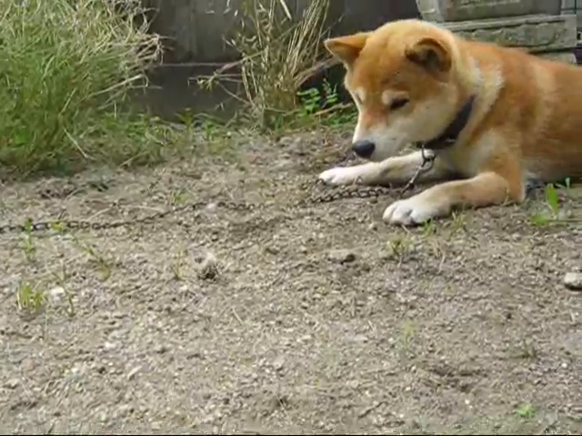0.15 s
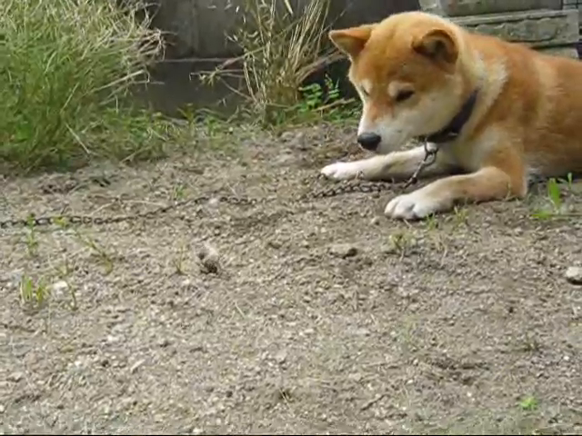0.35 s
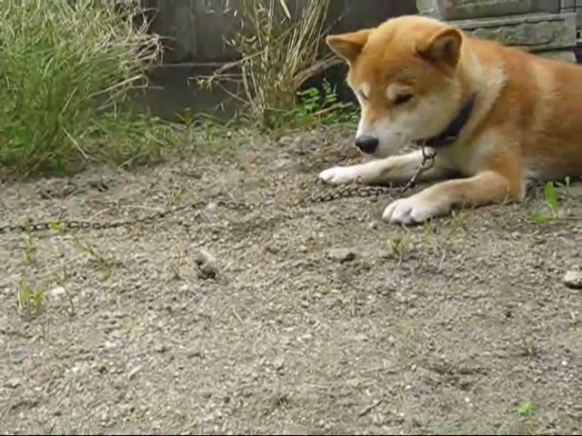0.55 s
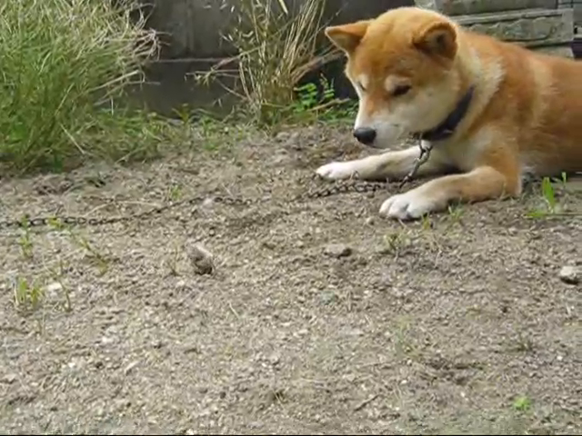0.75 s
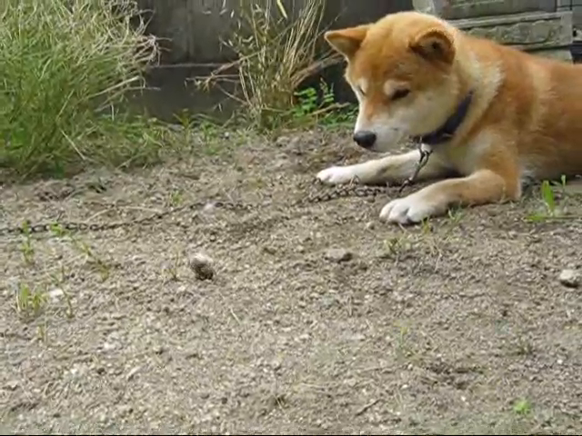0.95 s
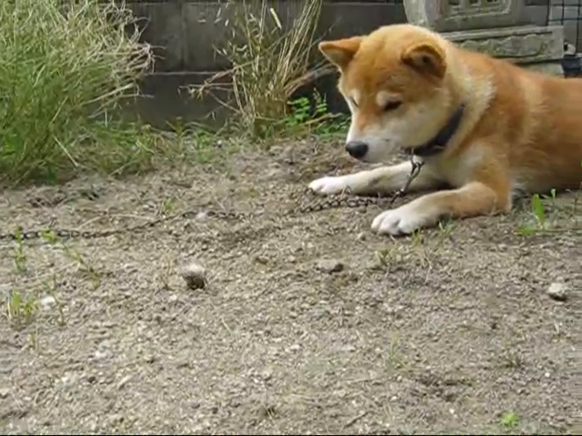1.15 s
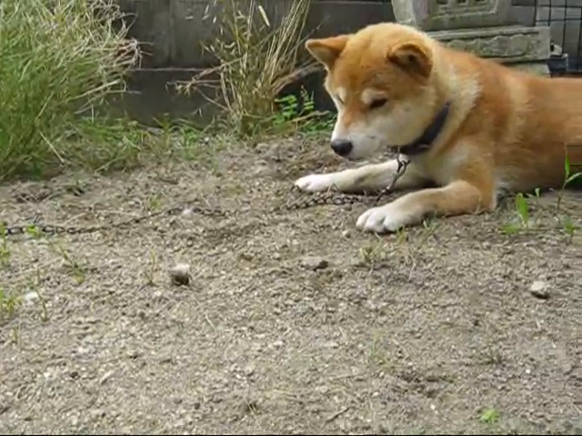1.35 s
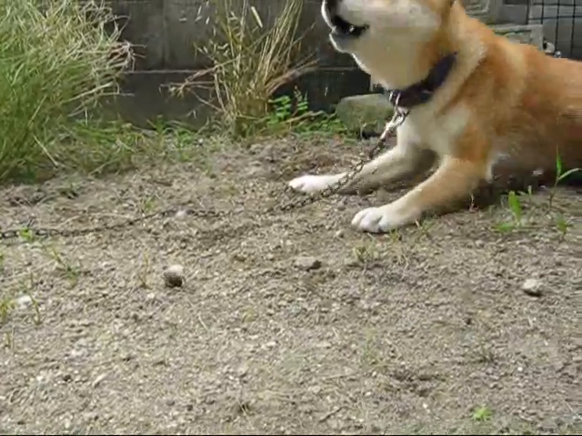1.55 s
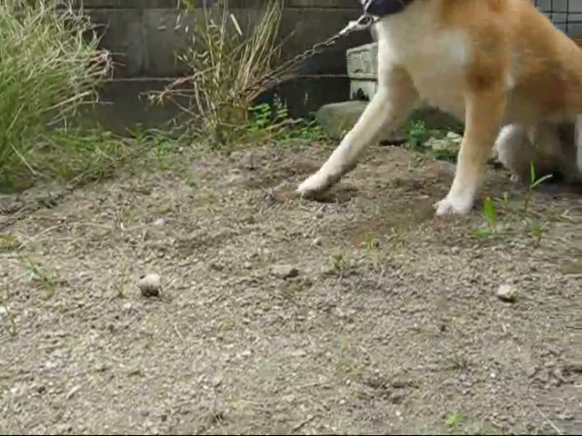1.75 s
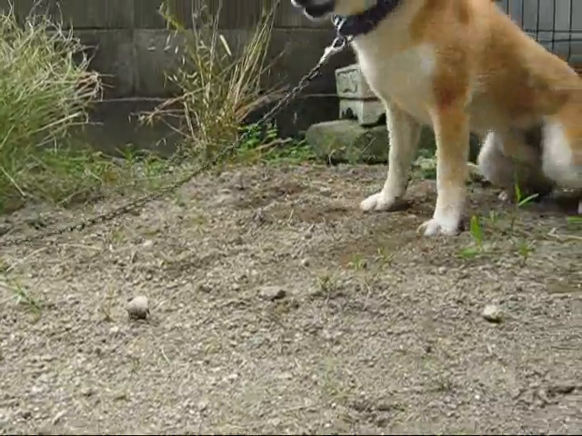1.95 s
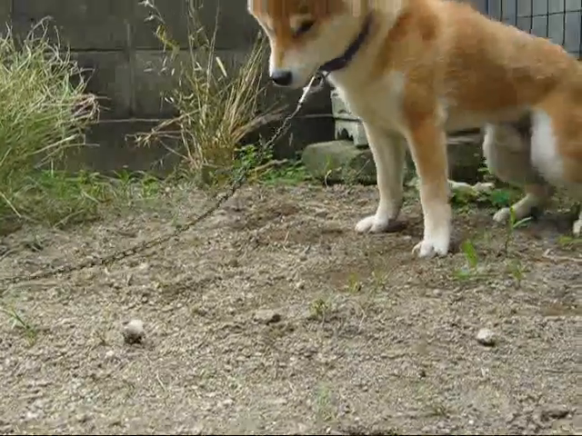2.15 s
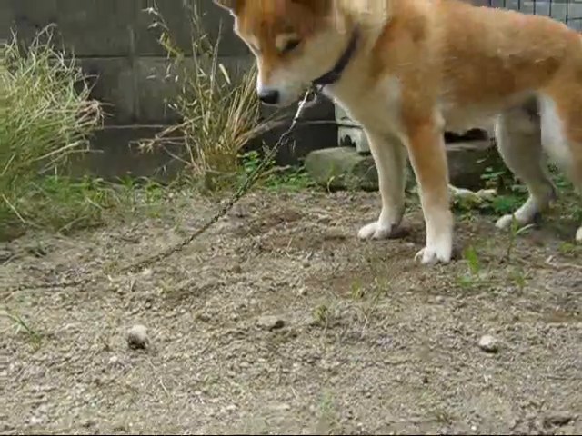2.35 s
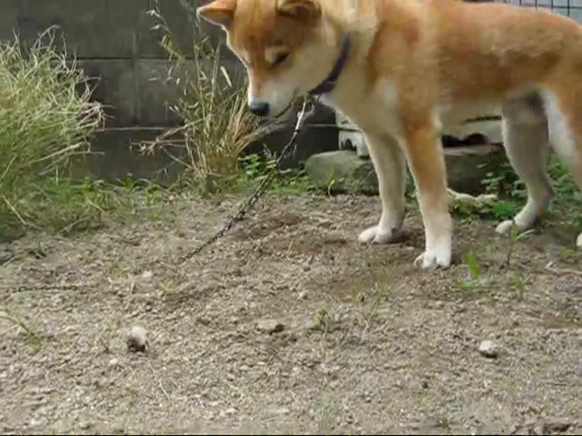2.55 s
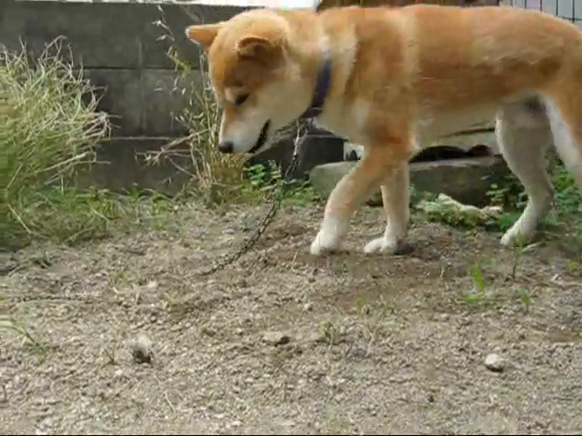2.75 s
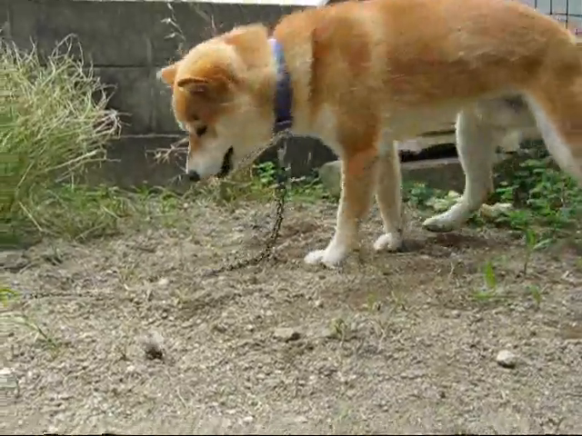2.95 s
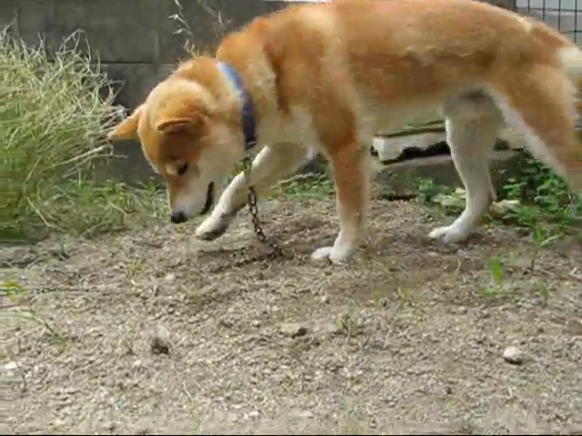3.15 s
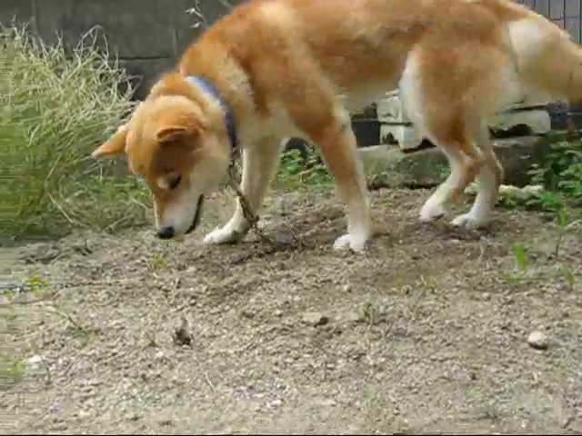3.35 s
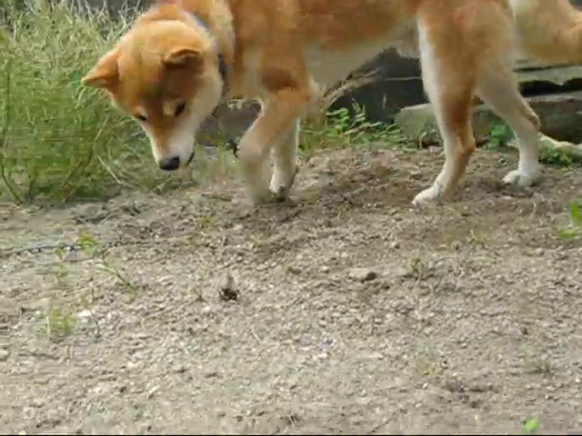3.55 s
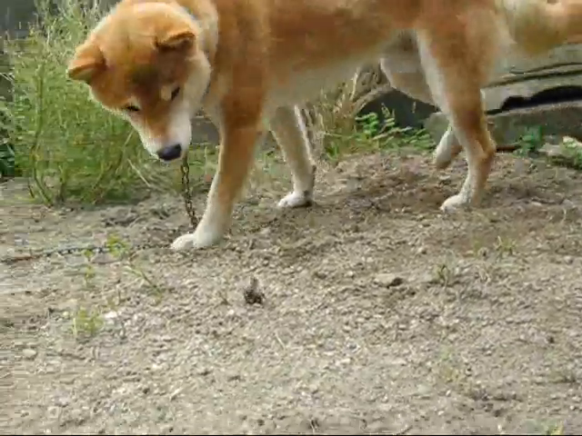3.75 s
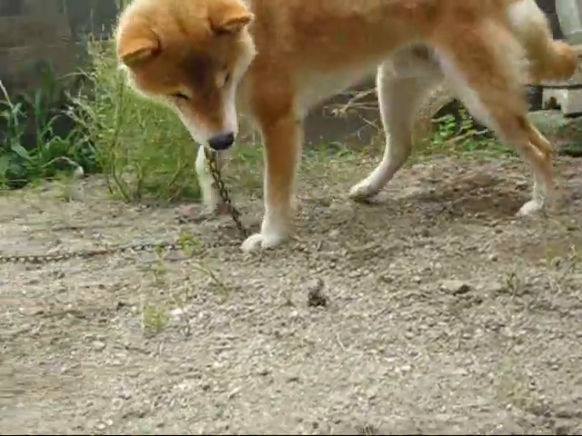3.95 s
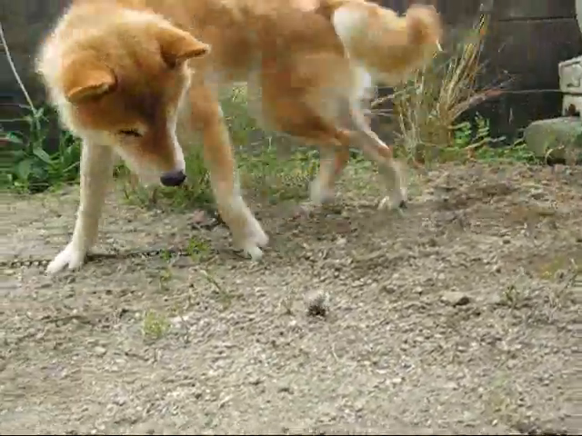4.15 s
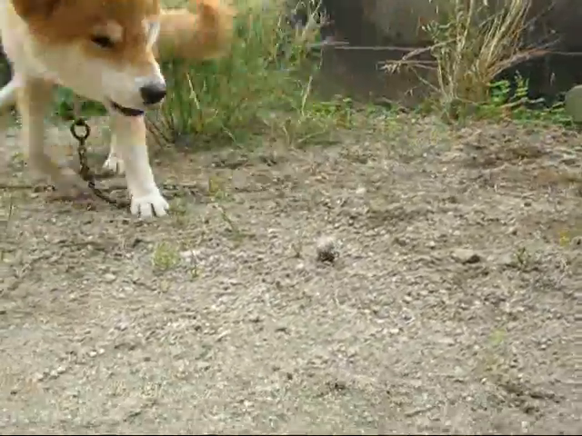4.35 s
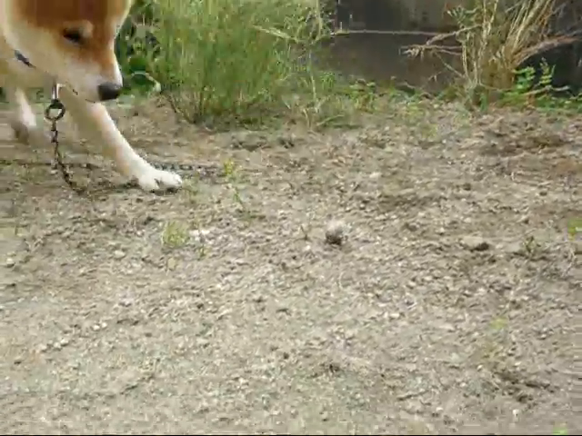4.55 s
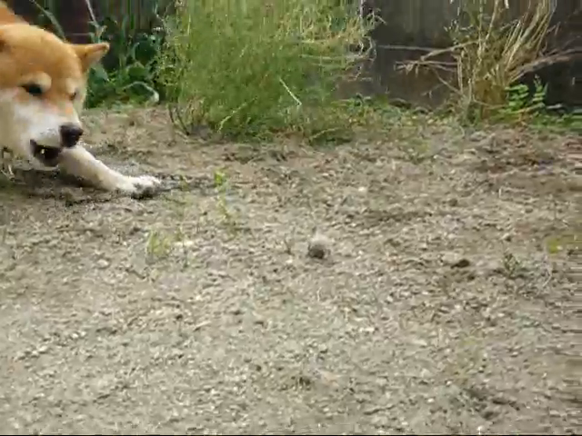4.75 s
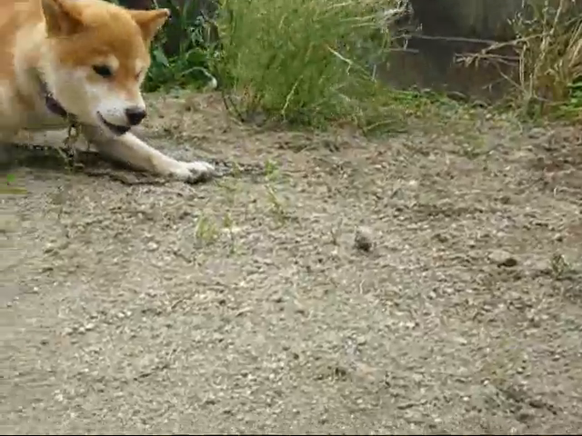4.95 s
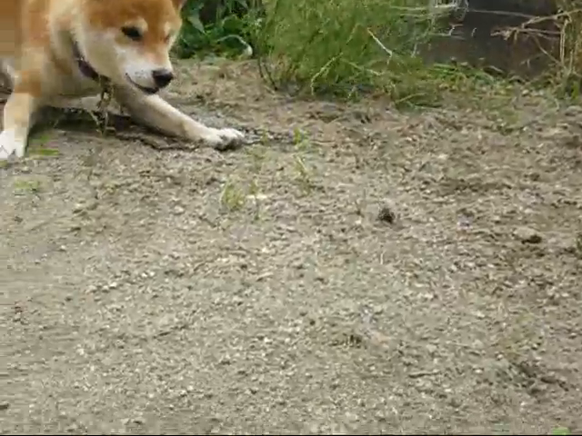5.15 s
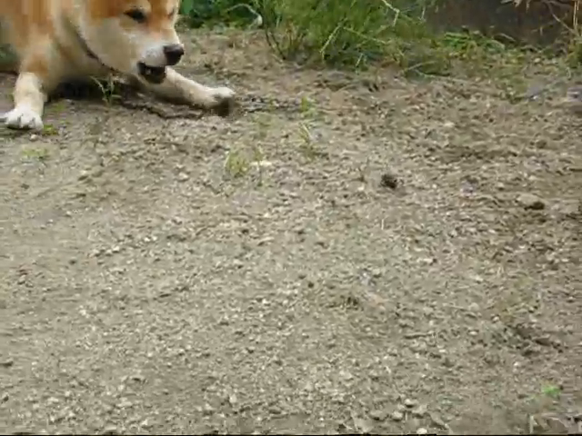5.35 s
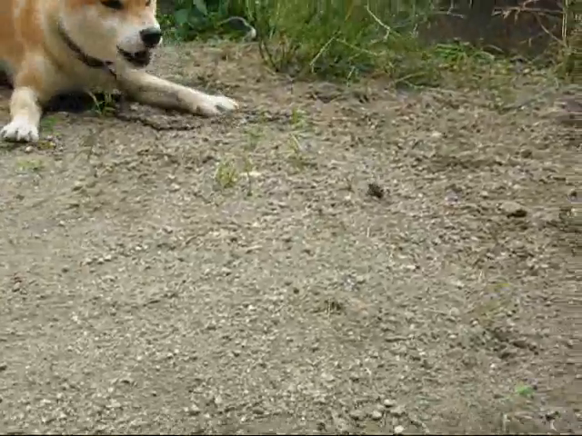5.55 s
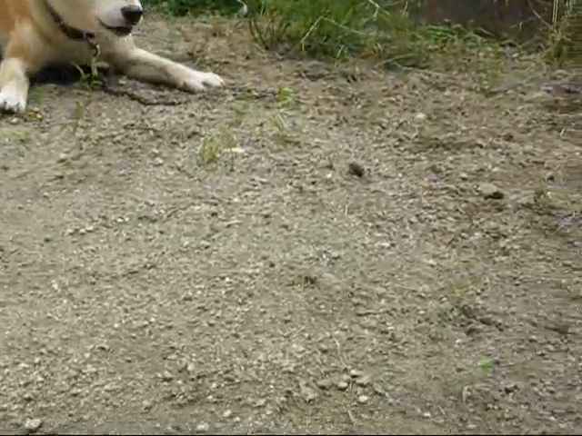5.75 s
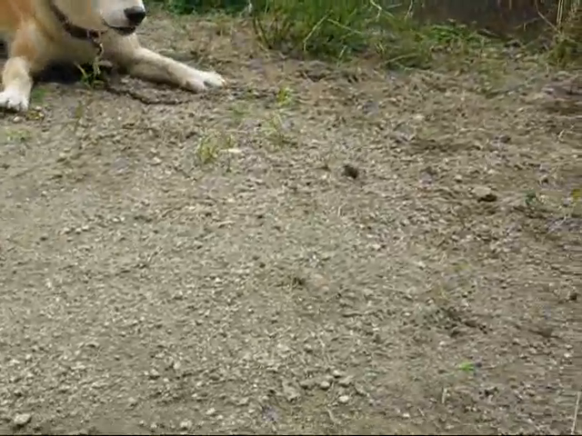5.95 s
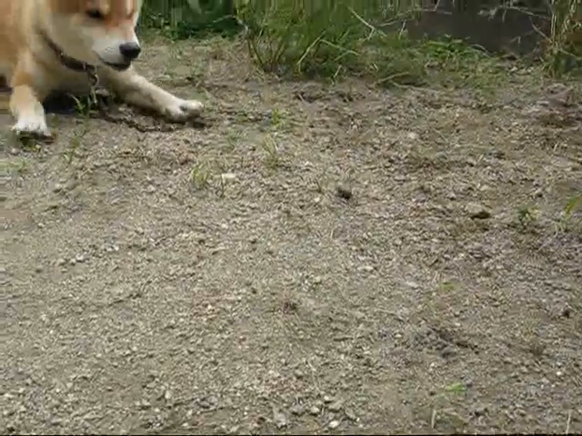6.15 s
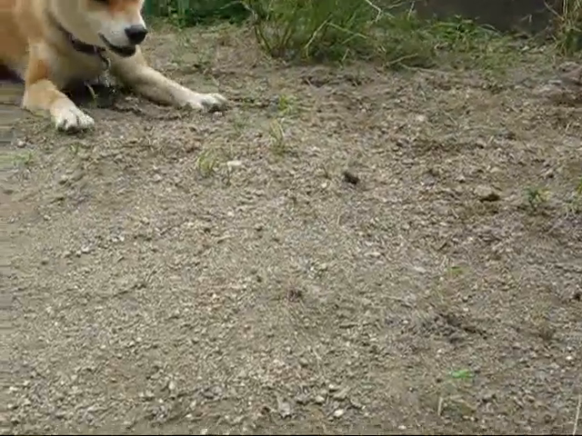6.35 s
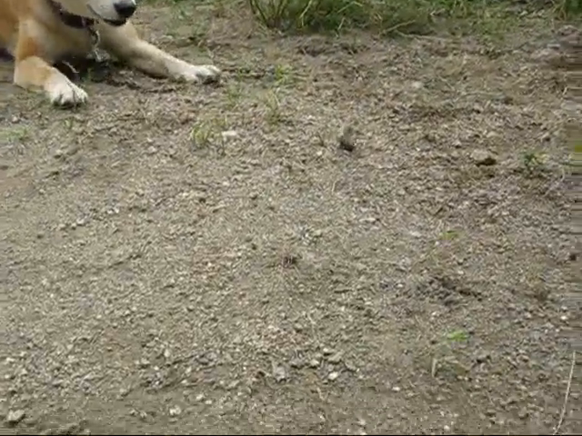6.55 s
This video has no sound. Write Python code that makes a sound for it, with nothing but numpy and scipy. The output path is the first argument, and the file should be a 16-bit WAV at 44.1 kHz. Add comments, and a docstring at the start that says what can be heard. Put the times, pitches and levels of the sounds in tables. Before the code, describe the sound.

A young dog is heard close up in a gravel yard, through a cheap pocket camera that sounds coarse, crackly and bright with false treble. From 0 to 0.5 s it whines in short, thin nasal whistles around 2 kHz, then snorts softly at 0.6. After one more whimper at 1.3, a sharp bark at 1.46 stretches into a loud, wavering howl that cracks and sags, stopping abruptly near 1.95. Small whines return at 2.0-2.2 and 2.9-3.7, with sniffs at 2.6 and 3.8 and faint scuffs of paws and chain on gravel until about 4.3. Three short, raspy, overloaded barks follow at 4.3, 4.7 and 5.4, with slight wall echoes. Then it is quiet: faint birds twitter over low distant air, as throughout, with a chirp at 6.1, a nasal snort at 6.3 and small gravel scrapes to the end.

```python
"""Young dog on a chain

A young dog on a chain in a gravel yard whines in thin whistles, snorts, and barks four times,
the first bark drawn out into a howl: pulses and rasp ring a moving throat. Small birds twitter
far off as gliding sines; filtered grains crunch as gravel; noise makes the distant air.
A pocket camera close by turns its gain down at loud sound, overloads, and holds coarse samples
at a low rate, which mirrors every sound into the treble.
"""
import sys
import numpy as np
from scipy import signal
from scipy.fft import rfft, irfft
from scipy.io import wavfile
from scipy.ndimage import uniform_filter1d

SR = 44100
rng = np.random.default_rng(int(sys.argv[2]) if len(sys.argv) > 2 else 0)


def unload_wav(signal):
    """Save mono or channel-first audio to the path in sys.argv[1] as 16-bit WAV at rate SR, clipped to [-1, 1]."""
    wavfile.write(
        sys.argv[1],
        SR,
        np.round(np.clip(np.atleast_2d(signal).T, -1, 1) * 32767).astype(np.int16),
    )


N = 291060
TIME = np.arange(N) / SR
HOLD_SAMPLES = 4   # each stored sample lasts this long


def from_db(db):
    """Decibels to gain."""
    return 10 ** (np.asarray(db) / 20)


def rms_one(x):
    """Scale to unit power."""
    return x / np.sqrt(np.mean(x ** 2) + 1e-20)


def cut(x, hz, kind, order=2):
    """Butterworth low- or high-pass."""
    return signal.sosfilt(signal.butter(order, hz, kind, fs=SR, output="sos"), x)


def wobble(hz):
    """Random motion up to a given rate, spread 1."""
    return rms_one(cut(rng.standard_normal(N), hz, "low"))


def power(x, seconds):
    """Running mean square."""
    return np.abs(uniform_filter1d(x ** 2, max(int(seconds * SR), 1))) + 1e-12


def resonances(x, modes):
    """One two-pole output per resonance, signs alternating."""
    out = []
    for k, (hz, width_hz, db) in enumerate(modes):
        r = np.exp(-np.pi * width_hz / SR)
        poles = [1, -2 * r * np.cos(2 * np.pi * hz / SR), r * r]
        ring = (1 - r * r) / 2 * signal.lfilter([1, 0, -1], poles, x)
        out.append((-1) ** k * from_db(db) * ring)
    return np.array(out)


def swell(start_s, rise_s, decay_s, db):
    """Envelope that climbs linearly, then dies away exponentially."""
    age = TIME - start_s
    rise = np.clip(age / rise_s, 0, 1)
    return from_db(db) * rise * np.exp(-np.clip((age - rise_s) / decay_s, 0, 20))


# outdoor background spectrum: f/Hz, relative level/dB per Hz
AIR_SPECTRUM = [(15, -31), (25, -8.5), (102, -3.5), (145, -6.5), (226, -5), (708, -16.5), (882, -18.5),
                (1910, -18.5), (2170, -20.5), (4800, -19.5), (6240, -42.5), (10600, -120)]
AIR_RMS_DB = -46


def air():
    """Steady distant rumble and hiss: noise shaped in frequency."""
    hz, db = np.transpose(AIR_SPECTRUM)
    bins_hz = np.maximum(np.fft.rfftfreq(N, 1 / SR), 1)
    colour = from_db(np.interp(np.log(bins_hz), np.log(hz), db))
    colour = colour * (bins_hz < SR / HOLD_SAMPLES / 2)
    return from_db(AIR_RMS_DB) * rms_one(irfft(rfft(rng.standard_normal(N)) * colour, N))


# nearer birds: start t/s, mid-glide f/Hz, glide/octaves, level before yard and mix/dB
NEAR_CHIRPS = [(.068, 4014, -0.17, -45), (.495, 5250, -0.16, -36), (.75, 3650, -.28, -43.5),
               (.805, 4650, 0, -45), (1.098, 4570, .15, -45), (1.167, 3950, 0.33, -42.5),
               (1.276, 3950, 0.51, -42.5), (3.198, 3930, 0.16, -41.5), (3.217, 5100, .1, -40),
               (3.288, 4410, .25, -43), (3.39, 5180, .08, -37.5), (3.667, 4520, -0.23, -41),
               (6.132, 4122, .35, -35)]
CHIRP_S, CHIRP_BOW_OCTAVES = .033, .05
FAR_CHIRPS_PER_S, FAR_CHIRP_HZ, FAR_CHIRP_DB = 9.5, 3950, -46.5   # centres of the random draws


def birds(spread_octaves=0.6, glide_octaves=0.46, spread_db=3):
    """Each chirp is a short sine on a bowed glide; faint ones fall at random among the nearer ones."""
    far = []
    for when, high, up, near in rng.uniform(-1, 1, (int(FAR_CHIRPS_PER_S * N / SR), 4)):
        hz = FAR_CHIRP_HZ * 2 ** (spread_octaves * high)
        far.append(((when + 1) / 2 * N / SR, hz, glide_octaves * up, FAR_CHIRP_DB + spread_db * near))
    out = np.zeros(N)
    for start_s, hz, glide, db in list(NEAR_CHIRPS) + far:
        inside = (TIME >= start_s) & (TIME < start_s + CHIRP_S)
        u = (TIME[inside] - start_s) / CHIRP_S
        pitch_hz = hz * 2 ** (glide * (u - .5) - CHIRP_BOW_OCTAVES * (2 * u - 1) ** 2)
        envelope = from_db(db) * np.sqrt(np.abs(np.sin(np.pi * u)))
        out[inside] += envelope * np.sin(2 * np.pi * np.cumsum(pitch_hz) / SR)
    return out


# whines: top t/s, rise/s, fall/s, top f/Hz before waver, top level before yard/dB
WHINE_ARCHES = [(.03, .2, 0.01, 2060, -31.5), (0.18, 0.011, 0.023, 2235, -33),
                (0.211, 0.017, 0.019, 1913, -28.5), (.346, 0.022, 0.042, 2350, -30.5),
                (.495, 0.03, 0.041, 2220, -28), (1.321, .029, .006, 1974, -29),
                (2.007, 0.021, 0.031, 2110, -35), (2.153, .02, 0.035, 1920, -33),
                (2.874, .026, 0.011, 1820, -30), (3.04, .012, .02, 1994, -34.5),
                (3.068, 0.024, 0.011, 1726, -31.5), (3.233, .012, 0.02, 2060, -30.5),
                (3.266, 0.013, .017, 1693, -34.5), (3.406, 0.021, 0.032, 2123, -29),
                (3.569, 0.023, 0.03, 2040, -27.5), (3.721, 0.028, 0.031, 1880, -31.5)]
WHINE_FOOT_HZ, WHINE_FOOT_DB = 1390, -11   # pitch at both ends, and level there relative to the top
WHINE_ARCH = 1.5   # exponent; higher = sharper top


def whines(overtone_db=-27, waver=0.0056, edge_s=0.0056):
    """Nearly pure whistles through the nose; pitch and level rise and fall in one arch."""
    out = np.zeros(N)
    unsteady = 1 + waver * wobble(140)
    for top_s, rise, fall, hz, db in WHINE_ARCHES:
        inside = (TIME > top_s - rise) & (TIME < top_s + fall)
        t = TIME[inside] - top_s
        arch = np.abs(np.cos(np.pi / 2 * t / np.where(t < 0, rise, fall))) ** WHINE_ARCH
        pitch_hz = (WHINE_FOOT_HZ + (hz - WHINE_FOOT_HZ) * arch) * unsteady[inside]
        phase = 2 * np.pi * np.cumsum(pitch_hz) / SR
        edges = np.minimum(np.minimum(t + rise, fall - t) / edge_s, 1)
        envelope = from_db(db + WHINE_FOOT_DB * (1 - arch)) * edges
        whistle = np.sin(phase) + from_db(overtone_db) * np.sin(2 * phase)
        out[inside] += envelope * np.sqrt(2) * whistle
    return out


# snorts and sniffs: start t/s, rise/s, decay/s, level before yard/dB, nasal share of power/0-1
SNORT_BURSTS = [(0.603, 0.049, 0.061, -32.5, 0.1), (2.588, 0.041, 0.052, -34.5, 0.9),
                (3.7, 0.0092, 0.023, -37, 0.5), (3.837, 0.031, 0.039, -26, 0.6),
                (6.292, 0.023, 0.053, -31, 0.98)]
# nose resonances: f/Hz, width/Hz, relative level/dB
NOSE_MODES = [(706, 290, -6), (1410, 44, 1.5), (1906, 170, -3), (3430, 110, -8.5), (4610, 520, -13.5)]
# open muzzle resonances: f/Hz, width/Hz, relative level/dB
MUZZLE_MODES = [(766, 780, -2), (1850, 460, -2), (4230, 2500, -0.5)]


def snorts():
    """Bursts of turbulent air, shared between the nose and the muzzle."""
    nose = rms_one(resonances(rng.standard_normal(N), NOSE_MODES).sum(axis=0))
    muzzle = rms_one(resonances(rng.standard_normal(N), MUZZLE_MODES).sum(axis=0))
    out = np.zeros(N)
    for *shape, nasal in SNORT_BURSTS:
        nasal = np.clip(nasal, 0, 1)
        out += swell(*shape) * (np.sqrt(nasal) * nose + np.sqrt(1 - nasal) * muzzle)
    return out


# effort swells to a crest and ebbs; pitch, level and jaws all follow it
EFFORT_WIDTH, EBB_S = .58, .056   # width as a share of the time to the crest; ebb time


def slackness(age_s, crest_s):
    """One with no effort, zero at the crest of a bark."""
    width_s = np.where(age_s < crest_s, EFFORT_WIDTH * crest_s, EBB_S)
    return 1 - np.exp(-((age_s - crest_s) / width_s) ** 2)


# barks: start t/s, attack/s, time to crest/s, length before release/s, crest f/Hz, crest level/dB,
# swell/dB, crest roughness/0-1, crest mouth opening/dB, chest thump level/dB; levels before yard
BARK_EFFORTS = [(1.4615, 0.0041, .058, .13, 785.5, -4.5, 7.5, .53, 13.5, -10.5),
                (4.272, 0.0083, .095, 0.17, 715, 5.5, 18, 0.34, 3, -9.5),
                (4.725, 0.025, .102, 0.14, 735, 9.5, 11, .44, 6.5, -17),
                (5.399, .023, 0.094, 0.14, 719, 6, 10.5, .7, 4, -7.5)]
SLACK_PITCH_HZ, SLACK_MOUTH_DB = 466, 0   # the voice with no effort behind it
SLACK_ROUGHNESS = 0.066   # added with no effort
ONSET_DB, RELEASE_DB_PER_S = -31.5, 1054
LOUDNESS_LAG_S = 0.015   # level and jaws trail the pitch


def bark_controls():
    """Pitch, level, roughness, mouth: one swell of effort a bark, between quick attack and release."""
    out = np.array([[SLACK_PITCH_HZ], [-120], [0], [0]]) * np.ones(N)
    for start_s, attack, crest, length, hz, db, swell_db, rough, mouth_db, _ in BARK_EFFORTS:
        now = (TIME >= start_s) & (TIME < start_s + .5)
        age = TIME[now] - start_s
        slack = slackness(age, crest)
        late_slack = slackness(age - LOUDNESS_LAG_S, crest)
        onset_db = ONSET_DB * np.maximum(1 - age / attack, 0)
        release_db = -RELEASE_DB_PER_S * np.maximum(age - length, 0)
        out[:, now] = [hz + (SLACK_PITCH_HZ - hz) * slack,
                       db - swell_db * late_slack + onset_db + release_db,
                       rough + SLACK_ROUGHNESS * slack,
                       mouth_db + (SLACK_MOUTH_DB - mouth_db) * late_slack]
    return out


THUMP_DECAY_S = .007


def thumps(low_hz=175, high_hz=430):
    """The first slack flaps of the folds give a short low puff, starting halfway into each attack."""
    puff = cut(cut(rng.standard_normal(N), low_hz, "high"), high_hz, "low", order=4)
    envelope = sum(swell(start_s + attack / 2, attack / 2, THUMP_DECAY_S, db)
                   for start_s, attack, *_, db in BARK_EFFORTS)
    return puff / np.sqrt(power(puff, 0.013)) * envelope


# howl pitch before the final sag: t/s, f/Hz
HOWL_PITCH = [(1.568, 679), (1.598, 640.4), (1.616, 595), (1.648, 567), (1.718, 623), (1.762, 615),
              (1.86, 575.2)]
# howl mouth opening: t/s, level/dB
HOWL_JAWS = [(1.57, -0.5), (1.74, -5.5), (1.86, -15.5), (1.872, 8.5), (1.945, 5.5)]
# howl cracks: start t/s, roughness/0-1, recovery/s
HOWL_CRACKS = [(1.573, 0.18, .02), (1.627, 0.33, 0.0056), (1.863, .58, .036)]
HOWL_DB, HOWL_FULL_HZ, HOWL_DB_PER_OCTAVE = 12.5, 610, 35   # full level; weaker below that pitch
CRACK_RISE_S, CRACK_LOSS_DB = .008, 10   # loss at full roughness
HOWL_END_S, SAG_S, SAG_HZ = 1.947, .045, 95.55   # pitch sags as the howl gives out


def howl_controls():
    """The same four for the howl: clean between its cracks, and weaker as its pitch sinks."""
    pitch_hz = np.interp(TIME, *np.transpose(HOWL_PITCH))
    mouth_db = np.interp(TIME, *np.transpose(HOWL_JAWS))
    pitch_hz = pitch_hz - SAG_HZ * np.clip(1 + (TIME - HOWL_END_S) / SAG_S, 0, 1)
    rough = sum(depth * swell(start_s, CRACK_RISE_S, recovery, 0)
                for start_s, depth, recovery in HOWL_CRACKS)
    sink_db = HOWL_DB_PER_OCTAVE * np.minimum(np.log2(pitch_hz / HOWL_FULL_HZ), 0)
    release_db = -RELEASE_DB_PER_S * np.clip(TIME - HOWL_END_S, 0, .5)
    level_db = HOWL_DB + sink_db - CRACK_LOSS_DB * rough + release_db
    return np.array([pitch_hz, level_db, rough, mouth_db])


HANDOVER_S, HANDOVER_LENGTH_S = 1.538, .034   # the bark clears into the howl


def voice_controls():
    """The howl takes over from the first bark; the gate is open while the voice sounds."""
    howling = np.clip((TIME - HANDOVER_S) / HANDOVER_LENGTH_S, 0, 1) * (TIME < BARK_EFFORTS[1][0])
    mixed = howling * howl_controls() + (1 - howling) * bark_controls()
    pitch_hz, level_db, rough, mouth_db = mixed
    return level_db > -50, pitch_hz, level_db, rough, mouth_db


def moving_resonance(x, hz, width_hz, gate, size=64):
    """A resonance whose centre glides, stepped in short blocks while the gate is open."""
    out, state = np.zeros(N), np.zeros(2)
    r = np.exp(-np.pi * width_hz / SR)
    for i in np.unique(np.flatnonzero(gate) // size) * size:
        poles = [1, -2 * r * np.cos(2 * np.pi * hz[i] / SR), r * r]
        out[i:i + size], state = signal.lfilter([1, 0, -1], poles, x[i:i + size], zi=state)
    return (1 - r * r) / 2 * out


# throat and mouth resonances: f at rest pitch/Hz, width/Hz, relative level/dB
THROAT_MODES = [(634, 320, 9.5), (1163, 150, -5.5), (1864, 360, -8), (2076, 180, -9), (2500, 210, -16.5),
                (2970, 260, -20.5), (3244, 300, -24.5)]


def barks_and_howl(jitter=.14, shimmer=0.85, doubling=0.87, slope=1.2, rasp=.72, low_rasp=.55,
                   flutter_hz=130, low_edge_hz=480, rasp_edge_hz=2550, flare=3, flare_db=-31,
                   rest_pitch_hz=660, larynx_lift=0.59):
    """Vocal fold pulses, turning chaotic with roughness, ring the throat; an open mouth brightens them."""
    gate, pitch_hz, level_db, rough, mouth_db = voice_controls()
    rough = np.clip(rough, 0, .95)
    jittered_hz = pitch_hz * (1 + jitter * rough * wobble(flutter_hz))
    phase = 2 * np.pi * np.cumsum(jittered_hz) / SR
    pulses = (1 - rough) * sum(np.cos(k * phase) / k ** slope for k in np.arange(1, 8))
    # strained folds beat unevenly, strong and weak in turn
    uneven = shimmer * wobble(flutter_hz) + doubling * np.cos(phase / 2)
    pulses = pulses * (1 + rough * uneven)
    # turbulent air escapes mostly while the folds are open; its treble needs wide jaws
    hiss = rasp * rough * 8 * rng.standard_normal(N) * (1 + 0.65 * np.cos(phase))
    treble = from_db(flare_db + flare * mouth_db) * cut(hiss, rasp_edge_hz, "high", order=4)
    hiss = cut(hiss, rasp_edge_hz, "low", order=8) + treble
    # the larynx rises with pitch, which shortens the throat and lifts its resonances
    lift = (pitch_hz / rest_pitch_hz) ** larynx_lift
    voice = np.zeros(N)
    for k, (hz, width_hz, db) in enumerate(THROAT_MODES):
        if k == 0:
            source = pulses + low_rasp * hiss
        else:
            source = -(-1) ** k * from_db(mouth_db) * (pulses + hiss)
        voice += from_db(db) * moving_resonance(source, hz * lift, width_hz, gate)
    voice = cut(voice, low_edge_hz, "high", order=6)
    # the folds swing with a steady size however irregular their timing
    steady_power = uniform_filter1d(power(voice, 0.014), size=130)
    envelope = uniform_filter1d(gate * from_db(level_db), size=40)
    return envelope * voice / np.sqrt(np.abs(steady_power))


# paws and chain on the gravel: start t/s, rise/s, decay/s, level before yard/dB, centre f/Hz
GRAVEL_SCUFFS = [(2.3, 0.42, 0.21, -39.5, 721), (3.335, 0.038, 0.015, -38, 677),
                 (3.39, 0.022, 0.045, -44, 4520), (3.708, 0.021, 0.028, -37.5, 950),
                 (4.008, 0.0074, 0.0063, -43.5, 1428), (4.031, 0.056, 0.081, -41.5, 2440),
                 (4.171, 0.073, 0.1, -40.5, 2500), (6.268, 0.0015, 0.015, -37.5, 2523),
                 (6.52, 0.027, 0.027, -40.5, 2120)]


def gravel(grains_per_s=2500, spread_db=3, width=0.85):
    """Random grains ring one broad resonance: dull under a pad, bright under the dragging chain."""
    hits = rng.random(N) < grains_per_s / SR
    grains = hits * rng.standard_normal(N) * from_db(spread_db * rng.standard_normal(N))
    out = np.zeros(N)
    for *shape, hz in GRAVEL_SCUFFS:
        crunch = resonances(grains + 1e-18, [(hz, width * hz, 0)])[0]
        out += swell(*shape) * rms_one(crunch)
    return out


def yard(x, wet_db, t60, wall_s=0.017, dull_hz=3000):
    """Scattered echoes come back from the block wall and the house: dulled, decaying noise."""
    age = TIME[:SR]
    echoes = rng.standard_normal(SR) * from_db(-60 * age / t60) * np.clip(age / wall_s, 0, 1) ** 2
    echoes = cut(echoes / np.sqrt(np.sum(echoes ** 2)), dull_hz, "low", order=1)
    return x + from_db(wet_db) * signal.fftconvolve(x, echoes)[:N]


# nearby walls: delay t/s, level/dB
WALL_ECHOES = [(.019, -23.5), (.031, -18.5), (.043, -26.5), (.072, -25.5)]


def scene():
    """Barks aim at the microphone; the softer sounds reach it more by way of the walls."""
    voice = barks_and_howl() + thumps()
    slaps = sum(from_db(db) * np.interp(TIME - delay_s, TIME, voice, left=0)
                for delay_s, db in WALL_ECHOES)
    loud = yard(voice, wet_db=-20.0, t60=0.29) + slaps
    far_birds = from_db(-0.5) * yard(birds(), wet_db=-1.5, t60=.2)
    soft = yard(whines() + snorts() + far_birds + gravel(), wet_db=-3.5, t60=.3)
    return (loud + soft + air())[None]


def gain_control(x, threshold_db=-11.5, release_db_per_s=20, attack_s=0.038):
    """Power over the threshold pulls the gain down; it creeps back at a fixed rate in dB."""
    excess_db = np.maximum(10 * np.log10(power(x, 0.0018)) - threshold_db, 0)
    ramp_db = release_db_per_s * TIME
    held_db = np.maximum.accumulate(excess_db + ramp_db) - ramp_db
    pole = np.exp(-1 / (attack_s * SR))
    return x * from_db(-signal.lfilter([1 - pole], [1, -pole], held_db))


STEP = 1 / 128   # converter step, full scale = 1
CUTOFF_HZ = 15900


def record(dry, ceiling=0.31, knee=6, bias=0.37, band_hz=5150, coupling_hz=45):
    """Gain control, overload, then coarse samples that are each held for a while; the top is cut."""
    x = gain_control(dry[0])
    x = x / (1 + np.abs(x / ceiling) ** knee) ** (1 / knee)
    x = cut(cut(x, band_hz, "low", order=4), coupling_hz, "high", order=1)
    # sound quieter than one step only flips the converter now and then, which crackles
    coarse = STEP * (np.round(x[::HOLD_SAMPLES] / STEP - bias) + bias)
    stairs = np.repeat(coarse, HOLD_SAMPLES)[:N]
    stairs = cut(stairs, 4, "high", order=1)   # removes the bias offset
    top_cut = signal.ellip(10, .2, 80, CUTOFF_HZ, fs=SR, output="sos")
    return signal.sosfilt(top_cut, stairs)[None]


dry = scene()
out = record(dry)
unload_wav(out)
```